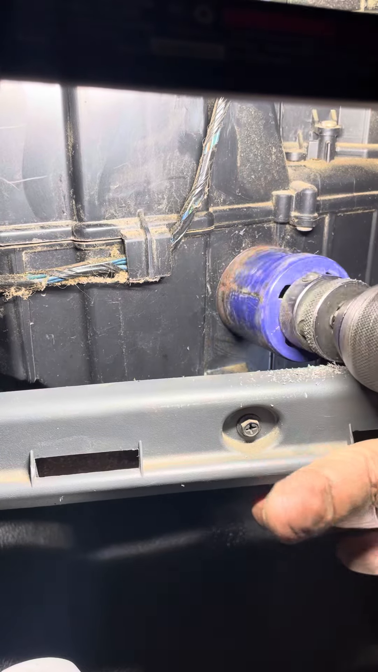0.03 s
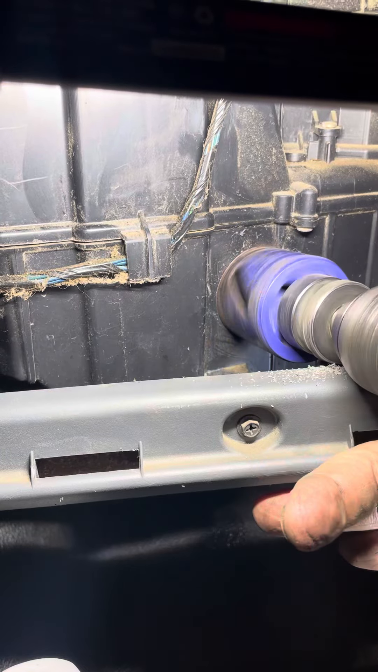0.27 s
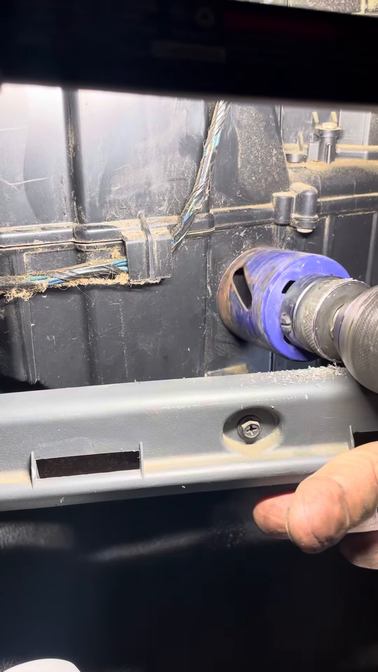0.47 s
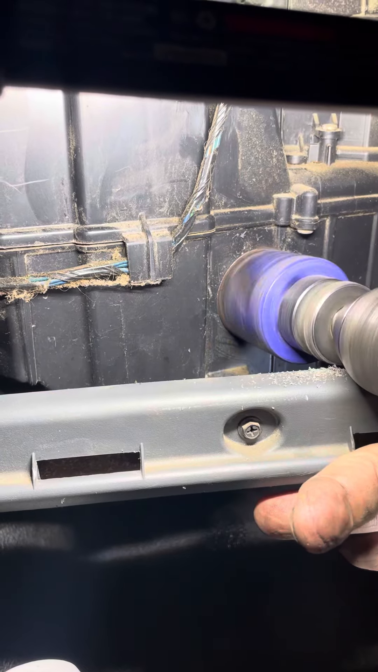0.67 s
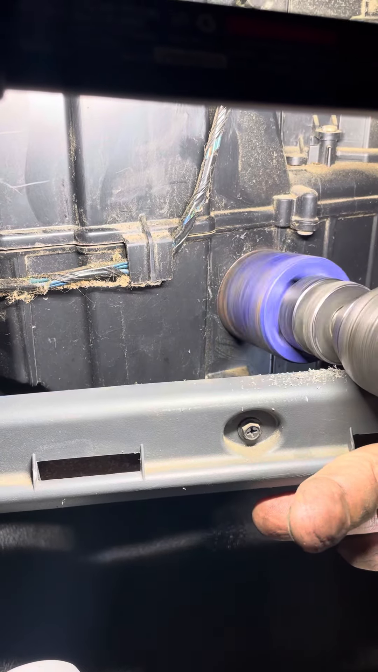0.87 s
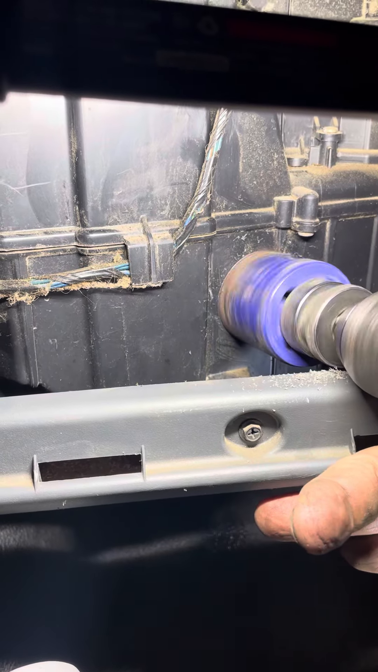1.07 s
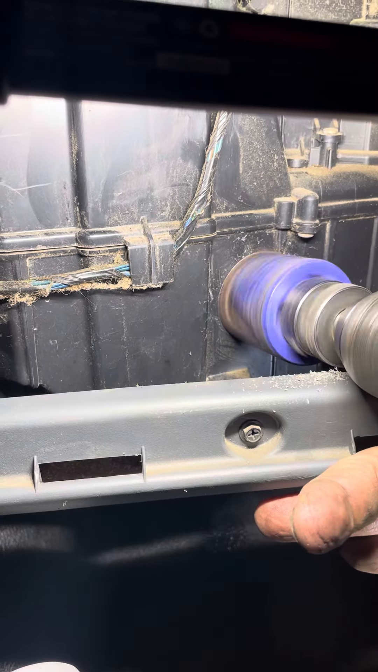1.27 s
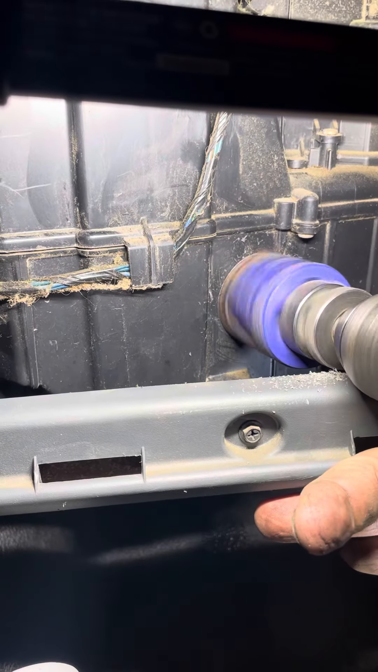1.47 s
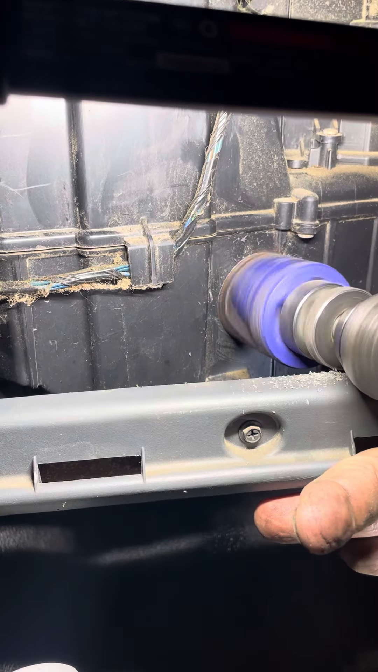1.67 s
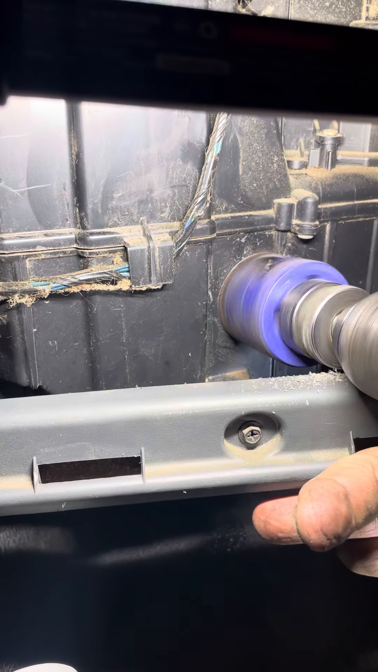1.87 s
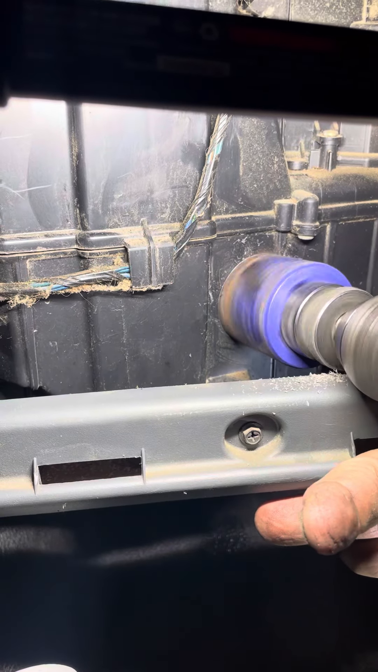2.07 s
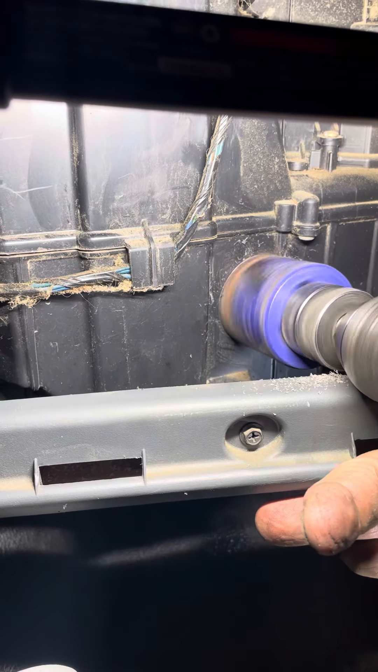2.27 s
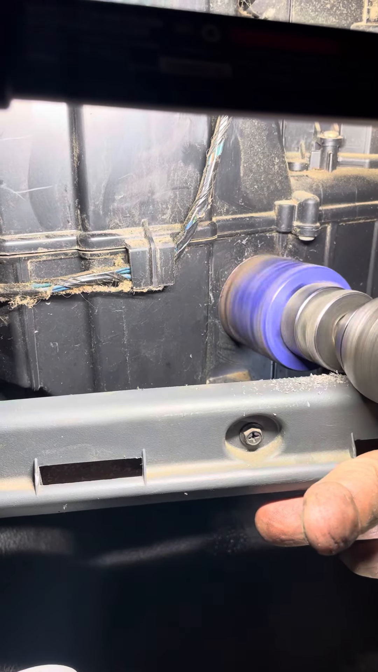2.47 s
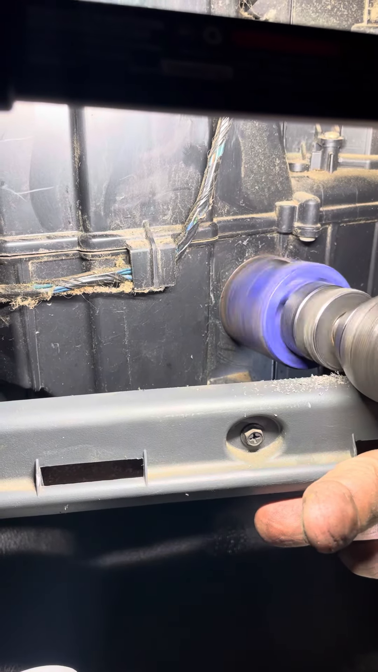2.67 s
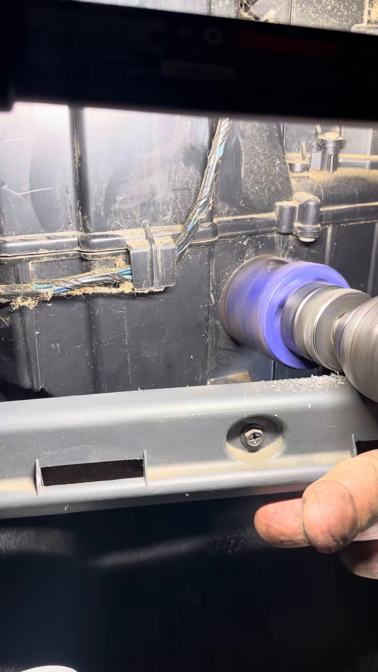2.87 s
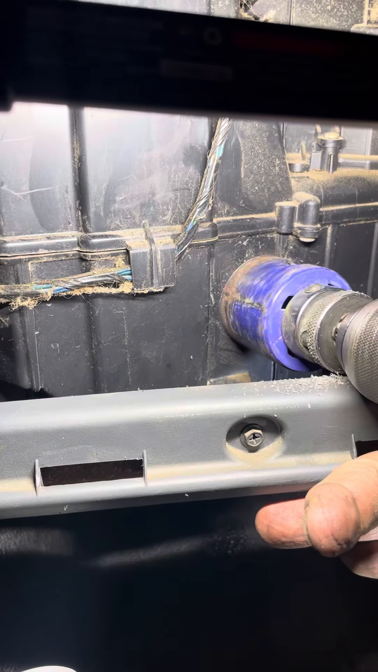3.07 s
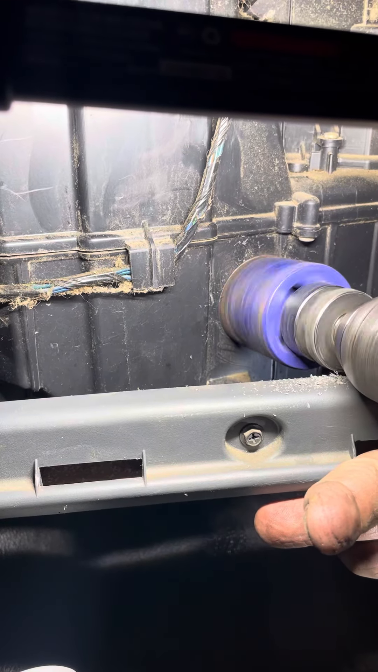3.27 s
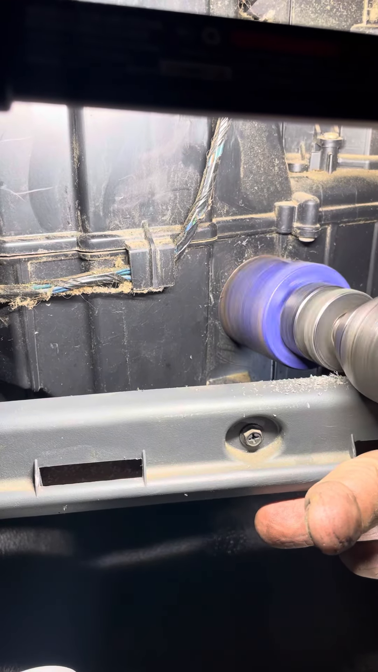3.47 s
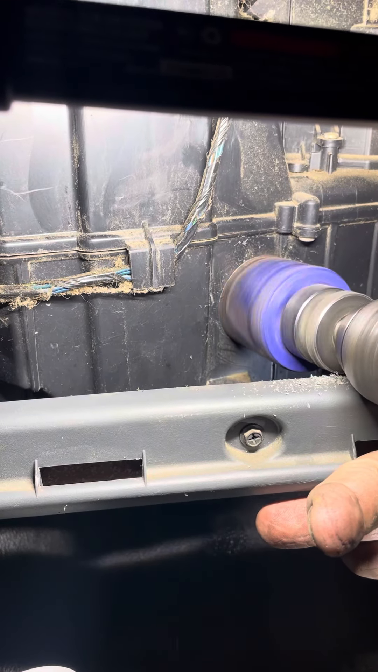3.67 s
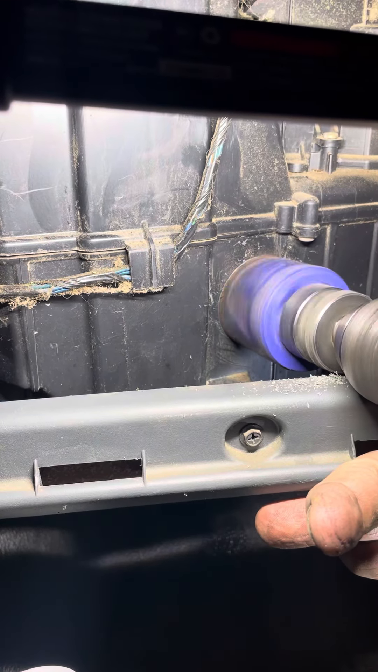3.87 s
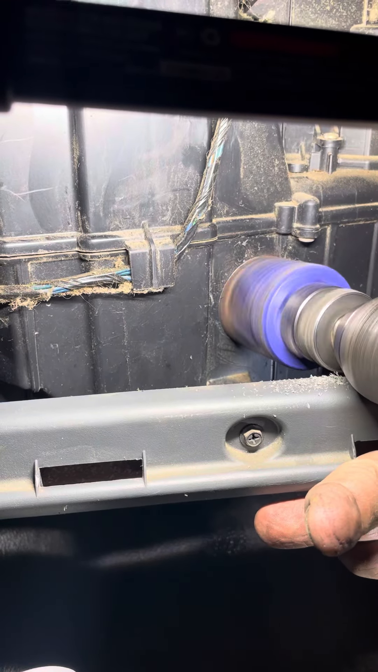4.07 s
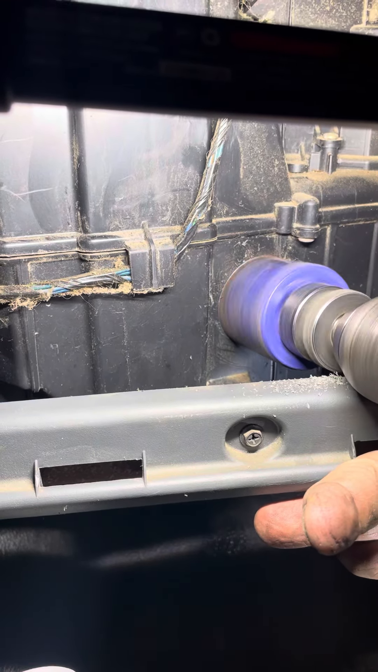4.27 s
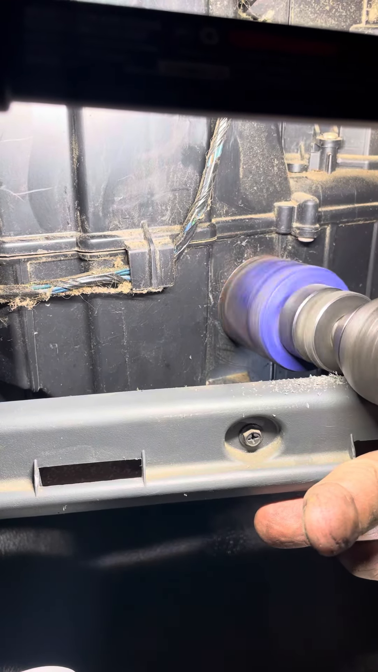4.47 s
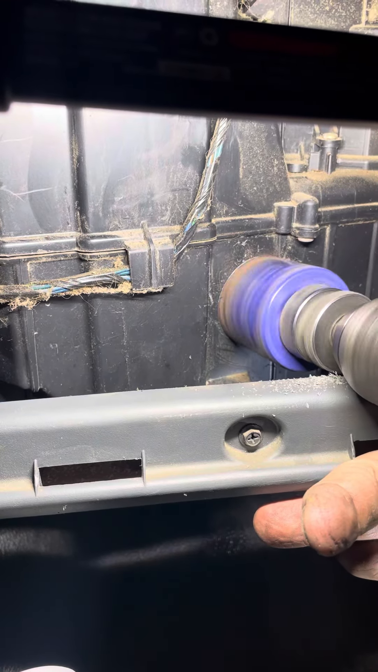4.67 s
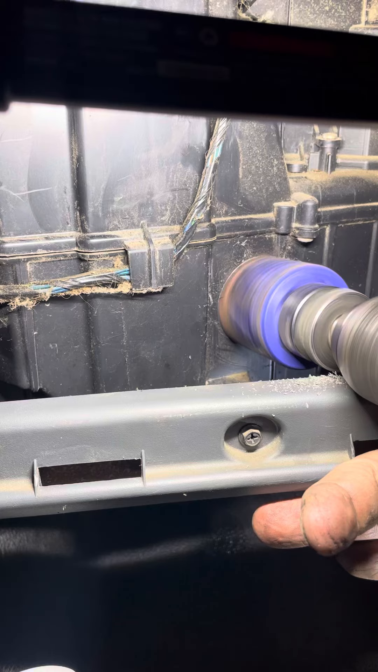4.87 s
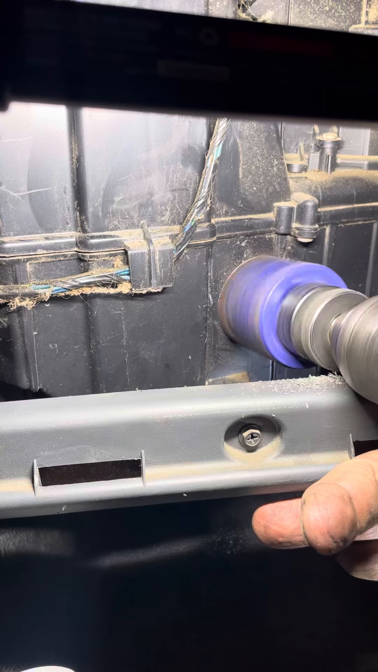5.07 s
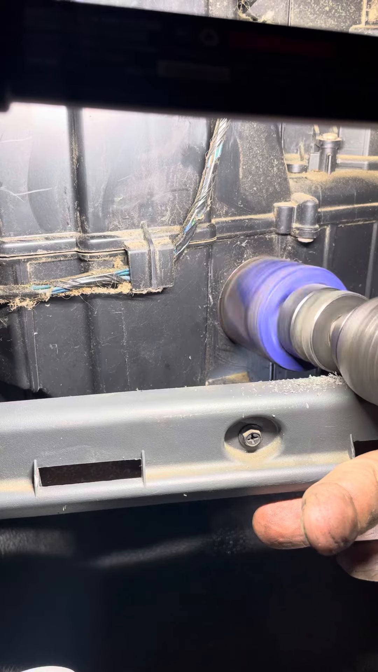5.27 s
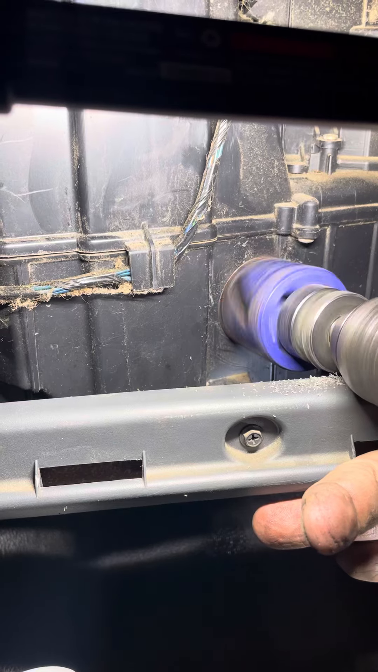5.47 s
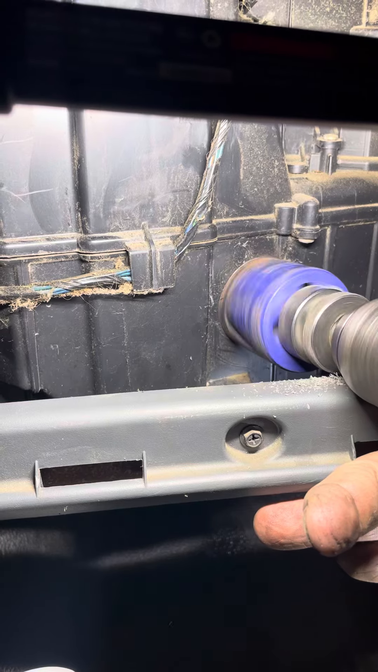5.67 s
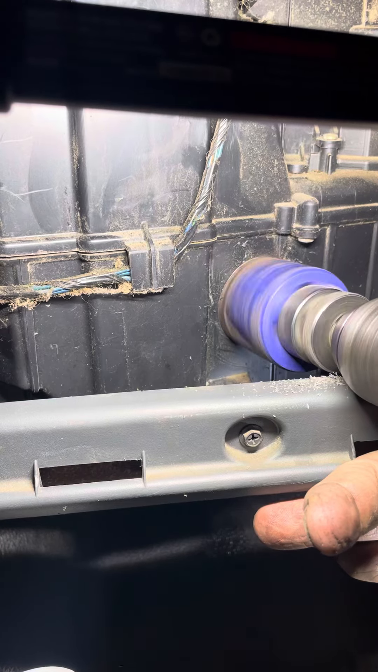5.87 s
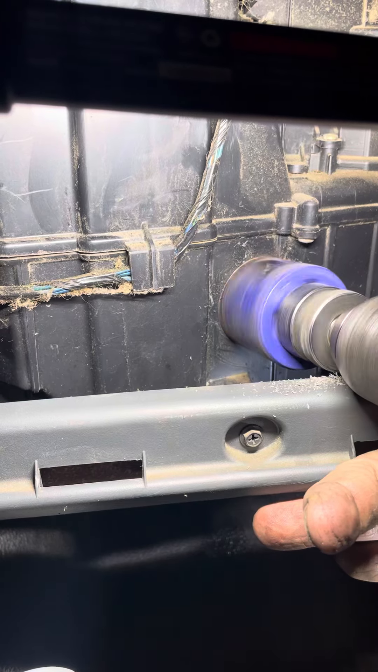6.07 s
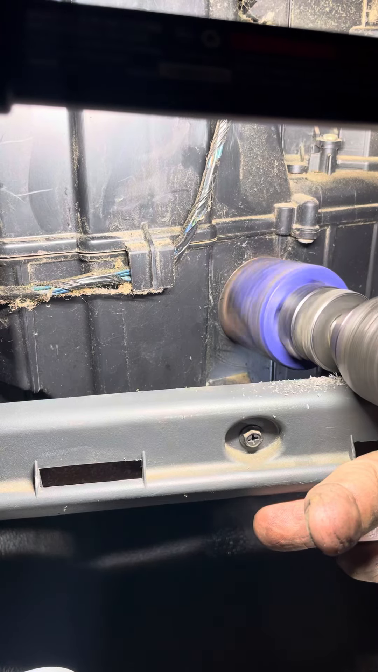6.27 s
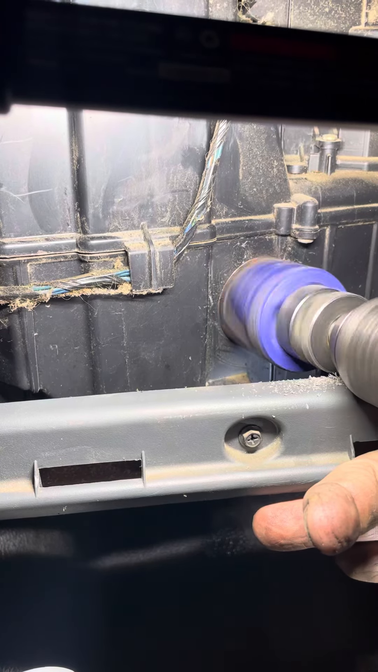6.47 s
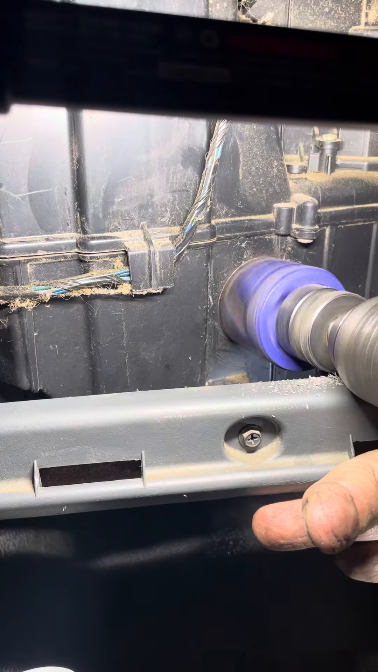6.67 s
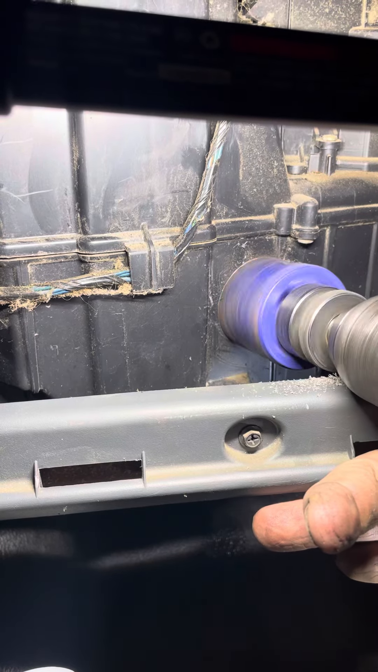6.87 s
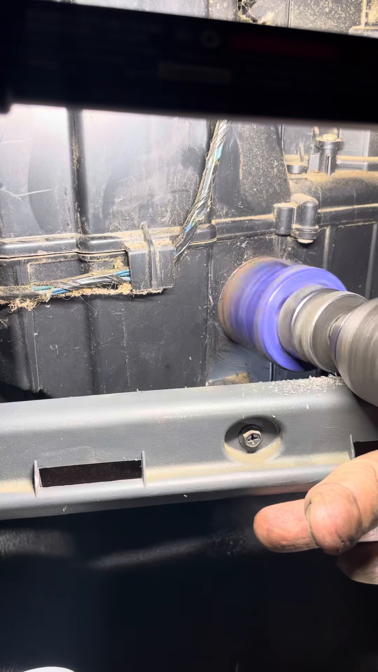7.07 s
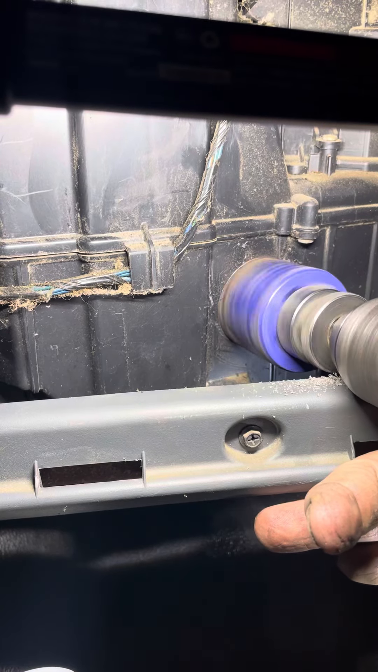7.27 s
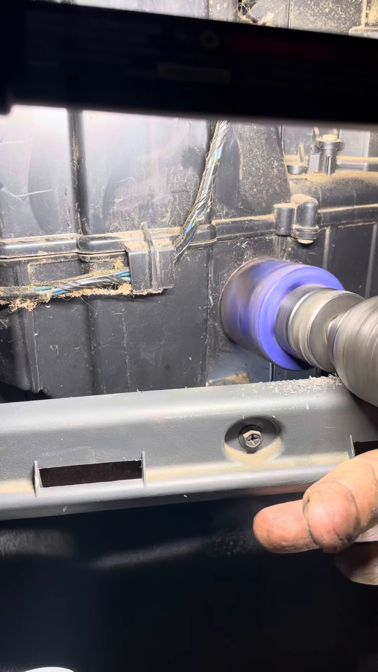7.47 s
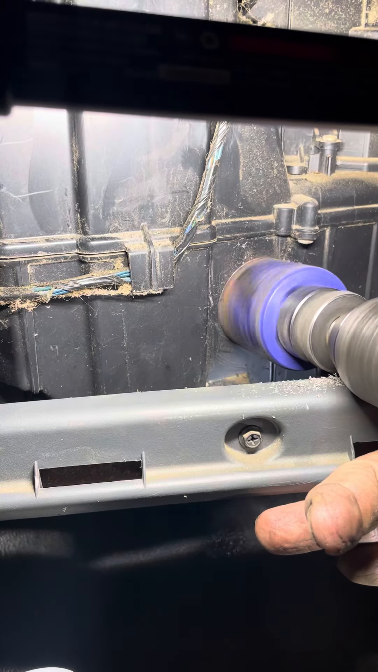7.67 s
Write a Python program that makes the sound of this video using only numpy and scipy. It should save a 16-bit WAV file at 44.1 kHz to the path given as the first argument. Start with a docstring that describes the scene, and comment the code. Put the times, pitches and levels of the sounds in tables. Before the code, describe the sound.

Very close in a vehicle cabin, a cordless drill turns a hole saw against plastic. A weak low burst, a stronger short one and a steadier cut of about two seconds are separated by clicks and near silence. After another brief stop it surges to a higher whine with quick rhythmic squawks, then drops lower, thuds bumping with each turn, and climbs again, still running at the end. A phone hears it in stereo, dry, with low trim rumble.

```python
"""In a vehicle cabin, a cordless drill turns a hole saw against a plastic panel, heard close by.
Two short bursts, a longer cut, a stop, then a long cut; a phone with two microphone ports listens.
Noise and worn-gear patterns rattle the housing, sines make the whine and hum, sagging once a turn.
Tooth plucks drum on resonances of the panel; tone bursts squawk at full speed and swelling thuds follow.
Behind them are trigger clicks, trim rumble, bulkhead boom and a low hush, all shaped noise."""
import sys
import numpy as np
from scipy import signal
from scipy.fft import rfft, irfft, next_fast_len
from scipy.io import wavfile
from scipy.ndimage import uniform_filter1d, map_coordinates

SR = 44100
rng = np.random.default_rng(int(sys.argv[2]) if len(sys.argv) > 2 else 0)


def output_pcm(signal):
    """Save a mono or channel-first signal as 16-bit PCM at the path in sys.argv[1].

    Samples are clipped to [-1, 1] before scaling.
    """
    pcm = np.clip(np.atleast_2d(signal).T, -1, 1) * 32767
    wavfile.write(sys.argv[1], SR, np.round(pcm).astype(np.int16))


N = 340893  # samples

# "Mesh rate" is how many gear teeth meet per second.
# Moves of the trigger. Each row: start in seconds, ramp in seconds, new mesh rate before load in Hz.
TRIGGER = [(.132, .066, 540), (.21, .14, 680), (.372, .1, 0), (.531, .088, 1296), (.803, .184, 0),
           (.984, .069, 652), (1.184, .059, 1261), (1.516, .1, 1215), (2.25, .1, 1180), (2.86, .12, 640),
           (2.98, .045, 0), (3.135, .045, 600), (3.19, .03, 830), (3.235, .035, 710), (3.337, .102, 1735),
           (3.608, .673, 1762), (5.195, .11, 1100), (5.34, .12, 878), (5.759, .109, 1274)]
# The groove's tight spot, its place in turns before and after the stop.
# Each row: time in seconds, place in turns.
TIGHT_SPOT = [(3.04, .631), (3.1, .825)]
# Deepening of the groove. Each row: time in seconds, share of the full depth.
DEPTH = [(2.9, 0), (4.8, 1)]
# The hand's push, which eases as the groove deepens. Each row: time in seconds, push in dB.
PUSH = [(.3, -0.5), (1.4, 0), (2.8, 0), (3.25, 0), (3.55, -0.5), (4.4, -3.5), (5.2, -4), (5.6, -3.5),
        (7.73, -4.5)]
# Drag round a turn in the shallow groove with the saw firmly seated.
# Each row: turns past the tight spot, speed change as a fraction.
DRAG_SHALLOW = [(0, -.068), (.12, -.035), (.26, -.045), (.4, .015), (.56, .055), (.7, .005), (.86, -.035),
                (1, -.068)]
# The same in the deep groove. Each row: turns past the tight spot, speed change as a fraction.
DRAG_DEEP = [(0, -.075), (.12, .03), (.3, .03), (.4, -.045), (.53, -.005), (.69, -.085), (.82, -.025),
             (.94, -.075), (1, -.075)]
# Drag of the binding cup at full speed. Each row: turns past the tight spot, speed change as a fraction.
DRAG_FULL = [(0, -.06), (.12, -.012), (.31, .036), (.46, -.006), (.6, .044), (.73, -.006), (.85, -.01),
             (1, -.06)]
PINION_TEETH, MESH_PER_TURN = 13, 200  # gear teeth per motor turn and per saw turn
CUT_HZ, FULL_HZ = 1250, (1400, 1700)  # mesh rates: an ordinary cut, and the approach to full speed
GRAZE_HZ = (720, 1050)  # mesh rates over which the saw goes from grazing the groove to sitting in it
WANDER = .007  # irregularity between turns, fraction of the speed

# Gearbox strength at an ordinary cut (dB), its power of speed, and dB per unit of speed change:
# the gears slow and quieten where the saw drags.
GEAR_DB, GEAR_GROWS, GEAR_DRAG_DB = -27, 0.4, 28
# Base level of the whine against the rattle. Each row: mesh rate in Hz, level in dB.
SING = [(500, -7.5), (900, -1), (1200, 2), (1750, 4.5)]
SING_LAG_S, SING_PUSH, SING_DRAG_DB = 0.02, 0.15, 20  # lag, extra share of the push, dB per speed change
SURGE_HZ_PER_S = 900  # rise in mesh rate that takes one dB off the whine
# Resonances of drill housing and saw cup. Each row: centre in Hz, width in Hz, relative level in dB.
HOUSING = [(850, 85, -4.5), (1330, 114, -6.5), (1766, 120, -5), (2300, 280, -2), (3180, 460, 1),
           (3834, 240, 3), (4880, 71, -2), (6765, 167, 7)]
# Colour of rasping chips and of clicks. Each row: frequency in Hz, relative level in dB.
RASP = [(150, -70), (450, 4.5), (750, 1), (1500, 1), (2800, 2), (4400, 0.5), (6000, 0), (7000, -11.5),
        (8000, -4), (10500, -11.5), (12700, -13.5), (14000, -22)]
# Partials of the whine. Each row: multiple of the mesh rate, relative level in dB.
WHINE = [(.75, -14), (1, 0), (1.25, -12), (1.43, -11), (1.9, -9), (2, 1), (2.85, -9), (3, -2.5), (4, -7)]
# How well the gearbox radiates its whine. Each row: frequency in Hz, relative level in dB.
GEARBOX = [(300, 0), (650, 6), (900, 5.5), (1000, 4), (1150, 7.5), (1240, 1), (1320, 5.5), (1500, -3),
           (1700, -.5), (1790, 2), (2000, -5), (2400, -5.5), (2850, -8), (3350, 4), (3600, 3.5), (3900, -1),
           (4450, -5), (4850, 0), (5100, -6), (5400, -5.5), (8000, -24)]
# Base level of the slower stage's hum. Each row: its tooth rate in Hz, level in dB.
HUM = [(20, -80), (150, -44), (250, -36), (300, -31), (345, -29.5), (400, -42), (470, -42), (525, -33),
       (600, -34.5), (660, -37), (720, -44), (850, -47)]
SLOW_STAGE, HUM_PUSH = .475, 1.1  # slower stage's rate over the mesh rate, its share of the push

# Base level of the drumming, set by speed. Each row: mesh rate in Hz, level in dB.
BITE = [(30, -56), (250, -28.5), (600, -28.5), (740, -31.5), (900, -31), (1130, -26), (1330, -23.5),
        (1750, -27.5)]
BITE_LAG_S = 0.011  # the drumming lags the speed
# Saw teeth per turn, groups of wide and narrow spacing per turn, shift as a share of the spacing.
SAW_STROKES, TOOTH_GROUPS, TOOTH_SHIFT = 48, 6, .2
# Resonances of the plastic panel. Each row: centre in Hz, width in Hz, relative level in dB.
PANEL = [(287, 33.5, 1.5), (339.6, 26.2, -1), (525, 72, -17), (903, 11, -12)]
# Broad colour of the drumming. Each row: frequency in Hz, relative level in dB.
DRUM = [(30, -4), (100, 9.0), (240, -11.5), (900, -2.5), (1500, 2.5), (3000, -32)]
# Further colour of the slackened panel at full depth. Each row: frequency in Hz, relative level in dB.
SLACK = [(180, 0), (255, 6), (300, 1.5), (360, -5.5), (560, 1.5), (1200, 5)]
# The cup is out of round and throbs, hardest at the tight spot. Each row: beats a turn, swing in dB.
THROB = [(1, 1.2), (3, 1.9), (4, 2), (6, 1.9)]
# The cup binds at full speed. Each row: time in seconds, level in dB before the common gain.
BINDS = [(3.513, -27), (3.626, -25), (3.739, -17.5), (3.854, -16), (3.969, -15.5), (4.082, -16),
         (4.196, -16.5), (4.307, -16.5), (4.425, -17.5), (4.538, -17.5), (4.649, -18), (4.764, -19),
         (4.881, -19), (4.995, -20), (5.109, -22), (5.22, -23.5)]
BIND_DB = 1  # common gain of the squawks
# Stick-slip tone. Each row: multiple of the slip rate, mean relative level in dB.
SLIP = [(2, 1), (3, 0), (4, 10), (5, 5), (6, 5.5), (7, -6), (8, -8), (9, 0)]
# High spots of the rim.
# Each row: turns past the tight spot, mean peak in dB, mean starting pitch in Hz, swell in seconds.
RIM = [(.14, -29, 235.5, 0.017), (.42, -26, 199, 0.013), (.63, -22.5, 165, .009)]
LOOSE_S = 5.2  # from this second the saw wanders in the deep cut and bumps its rim
# Trigger and gear slack. Each row: time in seconds, peak in dB before gain, noise draw and colour.
CLICKS = [(.1336, -31.5), (.163, -25), (.4818, -30.5), (.5372, -25), (.9674, -27.5), (.9906, -24.5),
          (2.9944, -36), (3.1263, -28), (3.147, -22.5)]

# Shaking of the whole trim, before push. Each row: mesh rate in Hz, level in dB.
SHAKE = [(30, -54.5), (600, -38.5), (900, -35), (1270, -35), (1750, -30)]
SETTLE_DB, SETTLE_DB_PER_S = -47, 122  # at first the trim is still settling: level and decay
# Colour of the shaking trim. Each row: frequency in Hz, relative level in dB.
RUMBLE = [(50, -28), (85, -5.5), (110, 0.5), (185, 0.5), (260, 0), (450, -7.5), (900, -34.5)]
# Colour of the bulkhead's boom. Each row: frequency in Hz, relative level in dB.
BOOM = [(20, -41), (35, -39), (50, -18), (66, -6.5), (90, -14.5), (150, -38), (400, -72)]
BOOM_DB, BOOM_GROWS, BOOM_PUSH = -38, 1, 1.37  # level at an ordinary cut, power of speed, share of push
# Colour of the cabin hush. Each row: frequency in Hz, relative level in dB.
CABIN = [(20, -31), (32, -26), (40, -12), (62, 27), (100, 24.5), (200, -32), (400, -3), (1500, -6),
         (6000, -17.5), (14000, -61)]

# Direct sound at the two ports. Each row: frequency in Hz, lead of the left port in radians.
LEAD = [(60, 0), (220, -.3), (400, -1.1), (600, -1.25), (950, -3), (1380, -2.4), (1810, -5.7), (2900, -3.4),
        (3450, -5.3), (3960, -5.2), (4310, -4.6), (5000, -6.7), (7000, -3.3), (8500, -2.9), (10000, -.4),
        (12000, 1.9)]
# Balance of the ports. Each row: frequency in Hz, left over right in dB.
TILT = [(200, 0), (330, 1.5), (750, 0), (1200, -5), (1500, -2), (1850, -4.5), (2750, 3), (3800, -1.5),
        (5200, .3)]
# Diffuse sound at the ports. Each row: frequency in Hz, share of the power.
DIFFUSE = [(200, 0.00041), (500, 0.0017), (900, 0.048), (1300, 0.14), (2200, 0.13), (3600, 0.33),
           (6000, 0.011), (12000, 0.013)]
TOP_HZ = 13200  # the phone's band limit


def gearbox(mesh, speed, turn):
    """Rattle and whine grow with speed and push; a stopped gearbox is silent."""
    drag = full_speed_drag(speed, turn)[1]
    effort = (speed / CUT_HZ) ** GEAR_GROWS * amp(GEAR_DB + curve(PUSH) + GEAR_DRAG_DB * drag)
    singing_gears = amp(singing(speed, turn)) * whine(mesh, speed)
    return effort * (rattle(mesh, speed) + singing_gears)


def rattle(mesh, speed, rasp_grows=0.78, motor_db=-0.5, turn_db=1, grit_db=-0.3, ring_db=-2, rasp_db=0.0):
    """Worn pinion and planets clatter in the housing; chips rasp with the motor shaft, more at speed."""
    shaft = np.cos(2 * np.pi * mesh / PINION_TEETH + 0.43 * wobble(40))
    saw_turn = np.cos(2 * np.pi * mesh / MESH_PER_TURN)
    gears = worn(mesh / PINION_TEETH) + worn(mesh / 10.6)
    force = .8 * gears + rng.standard_normal(N)
    force = force * amp(motor_db * shaft + turn_db * saw_turn + grit_db * wobble(900))
    chips = rng.standard_normal(N) * amp(motor_db * shaft + 1.36 * wobble(1200))
    ringing = amp(ring_db) * unit(resonate(force, HOUSING))
    rasping = amp(rasp_db) * (speed / CUT_HZ) ** rasp_grows * unit(coloured(chips, RASP))
    return ringing + rasping


def worn(turns, size=128):
    """A gear's surface errors are met again on every one of its turns."""
    errors = rng.standard_normal(size)
    return unit(map_coordinates(errors, [turns % 1 * size], mode="grid-wrap"))


def whine(mesh, speed, jitter=.2, eccentric=.22, flutter_db=2.2, steadied=.55):
    """Meshing teeth sing; backlash blurs the lines and shaft runout adds sidebands, less at full speed."""
    shaft = 2 * np.pi * mesh / PINION_TEETH
    loose = np.interp(speed, FULL_HZ, [1, steadied])
    runout = 0.099 * np.sin(shaft + wobble(30))
    backlash = jitter * wobble(90) + 0.18 * wobble(500)
    phase = 2 * np.pi * mesh + loose * (backlash + runout)  # radians
    tone = np.zeros(N)
    for multiple, db in WHINE:
        flutter = amp(db + flutter_db * wobble(70))
        sidebands = 1 + loose * eccentric * np.cos(shaft + wobble(22))
        tone += flutter * np.sin(multiple * phase) * sidebands
    return unit(coloured(footwell(tone), GEARBOX))


def singing(speed, turn):
    """Whine against rattle in dB: follows speed, push and drag, and holds back while the motor surges."""
    level_db = along(SING, lagging(speed, SING_LAG_S)) + SING_PUSH * curve(PUSH)
    drag_db = SING_DRAG_DB * full_speed_drag(speed, turn)[1]
    surge = uniform_filter1d(np.maximum(np.gradient(speed) * SR, 0), size=1500)
    return level_db + drag_db - surge / SURGE_HZ_PER_S


def footwell(x, t60=.07, wet_db=-13):
    """Close reflections overlap a wavering tone with its own past and break it into patches."""
    t = np.arange(SR // 10) / SR
    tail = rng.standard_normal(len(t)) * amp(-60 * t / t60)
    reflections = signal.fftconvolve(x, tail / np.linalg.norm(tail))[:N]
    return x + amp(wet_db) * reflections


def hum(mesh, speed, flutter_db=2, jitter=.2, twist=.55):
    """The slower gear stage feels the drag most; it hums into the panel, loudest near the panel's modes."""
    slip = mesh - np.cumsum(speed) / SR  # teeth gained or lost under load
    teeth = SLOW_STAGE * (mesh + twist * slip)
    hz = np.abs(np.gradient(teeth)) * SR
    level_db = along(HUM, hz) + HUM_PUSH * curve(PUSH) + flutter_db * wobble(55)
    tone = np.sin(2 * np.pi * teeth + jitter * wobble(70))
    return amp(level_db) * np.sqrt(2) * tone


def trigger_speed():
    """Mesh rate in Hz that the trigger asks for: each move ramps to a new speed."""
    t = np.arange(N) / SR
    steps = np.diff([0] + [hz for _, _, hz in TRIGGER])
    speed = np.zeros(N)
    for (s, ramp_s, _), step in zip(TRIGGER, steps):
        speed += step * np.clip((t - s) / ramp_s, 0, 1)
    return np.abs(speed)


def gear_speed(speed, turn):
    """Mesh rate in Hz under load: the groove's drag round each turn changes as it deepens."""
    full, full_drag = full_speed_drag(speed, turn)
    shallow = np.interp(turn % 1, *np.transpose(DRAG_SHALLOW))
    deep = np.interp(turn % 1, *np.transpose(DRAG_DEEP))
    ordinary = shallow + curve(DEPTH) * (deep - shallow)
    return speed * (1 + full_drag + (1 - full) * engaged(speed) * ordinary + WANDER * wobble(45))


def full_speed_drag(speed, turn):
    """How far the drill is into full speed (0-1), and the speed change the binding cup causes there."""
    full = np.interp(speed, FULL_HZ, [0, 1])
    return full, full * np.interp(turn % 1, *np.transpose(DRAG_FULL))


def engaged(speed):
    """How firmly the saw sits in the groove (0-1): at low speed it only grazes it."""
    return np.interp(speed, GRAZE_HZ, [.25, 1])


def lagging(speed, lag_s):
    """The speed as it was a moment ago."""
    t = np.arange(N) / SR
    return np.interp(t - lag_s, t, speed)


def cutting(mesh, speed, turn, uneven_db=2, chance_db=2, push_share=0.69):
    """Unevenly spaced and worn teeth pluck the panel in turn, with scraping between the plucks."""
    # near full speed the teeth skip instead of biting evenly
    scatter = np.interp(speed, [600, 1050, 1400, 1650], [.06, .06, .06, .3])
    spacing = TOOTH_SHIFT * np.sin(2 * np.pi * TOOTH_GROUPS * turn + wobble(14))
    strokes = mesh * SAW_STROKES / MESH_PER_TURN + spacing + scatter * wobble(110)
    strokes = np.maximum.accumulate(strokes)  # never backwards
    at = np.flatnonzero(np.diff(np.floor(strokes)))
    wear = rng.standard_normal(SAW_STROKES)[np.arange(len(at)) % SAW_STROKES]
    plucks = np.zeros(N)
    plucks[at] = amp(uneven_db * wear + chance_db * rng.standard_normal(len(at)))
    scraping = amp(-10) * rng.standard_normal(N)
    drum = coloured(resonate(unit(plucks) + scraping, PANEL), DRUM)
    drum = drum + curve(DEPTH) * (coloured(drum, SLACK) - drum)
    # level out the drumming, so that the depth of the bite sets the strength
    strength = np.sqrt(np.abs(uniform_filter1d(drum ** 2, size=4000)) + 1e-12)
    throb_db = sum(db * np.cos(2 * np.pi * beats * turn + 1.4 * wobble(2.95)) for beats, db in THROB)
    bite_db = bite(speed) + push_share * curve(PUSH) + engaged(speed) * throb_db
    bite_db = bite_db + 0.5 * wobble(50) + 1.53 * wobble(12)
    return amp(bite_db) * drum / strength


def bite(speed, size=4400):
    """Drumming level in dB, set by speed; a quick sweep through the resonance cannot build it up."""
    level = along(BITE, lagging(speed, BITE_LAG_S))
    return np.minimum(level, uniform_filter1d(level, size=size))


def squawks(slip_hz=288, centre=.0065, width=.0078, vary_db=2):
    """At each bind the cup chatters on multiples of the panel's lowest mode, each time in its own colour."""
    out, t = np.zeros(N), np.arange(-SR // 50, SR // 25) / SR
    for s, db in BINDS:
        phase = 2 * np.pi * slip_hz * t + 0.0044 * np.cumsum(rng.standard_normal(len(t)))
        tone = np.zeros(len(t))
        for multiple, level in SLIP:
            gain = amp(level + rng.normal(0, vary_db))
            tone += gain * np.sin(multiple * phase + rng.uniform(0, np.pi))
        swell = np.exp(-.5 * ((t - centre) / width) ** 2)
        add(out, s + t[0], amp(db + BIND_DB) * unit(tone) * swell)
    return out


def bumps(turn, fall=6, vary_db=1.2):
    """At each high spot the wandering saw shoves the trim: a dull thud swells and sinks in pitch."""
    out, t = np.zeros(N), np.arange(SR // 8) / SR
    for spot, db, hz, swell_s in RIM:
        phase = 2 * np.pi * np.cumsum(hz * np.exp(-fall * t)) / SR
        swell = (t / swell_s * np.exp(1 - t / swell_s)) ** 2
        for s in passes(turn, spot, LOOSE_S, N / SR):
            thud = swell * np.sin(phase * rng.uniform(.96, 1.04))
            add(out, s, amp(db + rng.normal(0, vary_db)) * thud)
    return out


def passes(turn, spot, start, end):
    """Times between start and end at which the saw passes a spot of the groove."""
    s = np.flatnonzero(np.diff(np.floor(turn - spot))) / SR
    return s[(s > start) & (s < end)]


def clicks(t60=.03, gain_db=-1):
    """The trigger and the slack of the gears tick as short decaying noise at starts and stops."""
    out, t = np.zeros(N), np.arange(SR // 16) / SR
    for s, db in CLICKS:
        add(out, s, amp(db + gain_db - 60 * t / t60) * rng.standard_normal(len(t)))
    return coloured(out, RASP)


def cabin(speed, push_share=0.087, hush_db=-48):
    """The trim rumbles with the saw and the bulkhead booms, over a low hush."""
    settling = amp(SETTLE_DB - SETTLE_DB_PER_S * np.arange(N) / SR)
    shaking = amp(along(SHAKE, speed) + push_share * curve(PUSH)) + settling
    rumble = shaking * unit(coloured(rng.standard_normal(N), RUMBLE))
    booming = (speed / CUT_HZ) ** BOOM_GROWS * amp(BOOM_DB + BOOM_PUSH * curve(PUSH))
    boom = booming * unit(coloured(rng.standard_normal(N), BOOM))
    hush = amp(hush_db) * unit(coloured(rng.standard_normal(N), CABIN))
    return rumble + boom + hush


def ports(x):
    """Two ports hear the direct sound with a phase lead between them, and each its own diffuse sound."""
    side = np.array([[.5], [-.5]])  # left, right

    def share(hz):
        """Diffuse share of the power."""
        return np.clip(along(DIFFUSE, hz), 0, 1)

    direct = filtered(x, lambda hz: np.sqrt(1 - share(hz)) * np.exp(1j * side * along(LEAD, hz)))
    diffuse = diffused(filtered(x, lambda hz: np.sqrt(share(hz))))
    return filtered(direct + diffuse, lambda hz: amp(side * along(TILT, hz)))


def diffused(x, size=512):
    """Diffuse sound differs at each port: same strength, random phase."""
    z = signal.stft(x, nperseg=size)[2]
    turned = z * np.exp(2j * np.pi * rng.random((2, *z.shape)))
    pair = signal.istft(turned, nperseg=size)[1][:, :N]
    return unit(pair) * np.std(x)


def amp(db):
    """Decibels to gain."""
    return 10 ** (np.asarray(db) / 20)


def unit(x):
    """Scale to rms 1."""
    return x / np.sqrt(np.mean(x ** 2) + 1e-20)


def along(points, hz):
    """Read (Hz, value) points on a log frequency axis."""
    f, v = np.transpose(points)
    return np.interp(np.log(hz + 1), np.log(f + 1), v)


def curve(rows):
    """One value per sample from (seconds, value) rows."""
    return np.interp(np.arange(N) / SR, *np.transpose(rows))


def wobble(rate):
    """A smooth random curve with rate knots a second."""
    knots = rng.standard_normal(int(N * rate / SR) + 4)
    return map_coordinates(knots, [np.arange(N) * rate / SR])


def filtered(x, response):
    """Multiply the spectrum of x by a complex response of frequency."""
    m = next_fast_len(N + SR // 2)
    return irfft(rfft(x, m) * response(np.fft.rfftfreq(m, 1 / SR)), m)[..., :N]


def coloured(x, spectrum):
    """Pass x through a (Hz, dB) spectrum."""
    return filtered(x, lambda hz: amp(along(spectrum, hz)))


def resonate(x, modes):
    """Ring x through a body's resonances, summed with alternating sign."""
    def response(f):
        """Sum of band-pass resonances."""
        total = 0
        for k, (centre, width, db) in enumerate(modes):
            damping = 1j * f * width
            total = total + (-1) ** k * amp(db) * damping / (centre * centre - f * f + damping)
        return total

    return filtered(x, response)


def add(track, s, sound):
    """Mix a sound into a track at time s."""
    part = track[max(round(s * SR), 0):][:len(sound)]
    part += sound[:len(part)]


def scene():
    """The trigger sets the speed; the saw's angle and the gear teeth passed drive the sources."""
    speed = trigger_speed()
    turn = np.cumsum(speed) / SR / MESH_PER_TURN - curve(TIGHT_SPOT)  # whole numbers at the tight spot
    mesh = np.cumsum(gear_speed(speed, turn)) / SR  # gear teeth passed
    drill = gearbox(mesh, speed, turn) + hum(mesh, speed)
    saw = cutting(mesh, speed, turn) + squawks() + bumps(turn)
    return ports(drill + saw + clicks() + cabin(speed))


def record(dry):
    """The phone keeps nothing above its band limit."""
    return filtered(dry, lambda hz: hz < TOP_HZ)


dry = scene()
out = record(dry)
output_pcm(out)
```